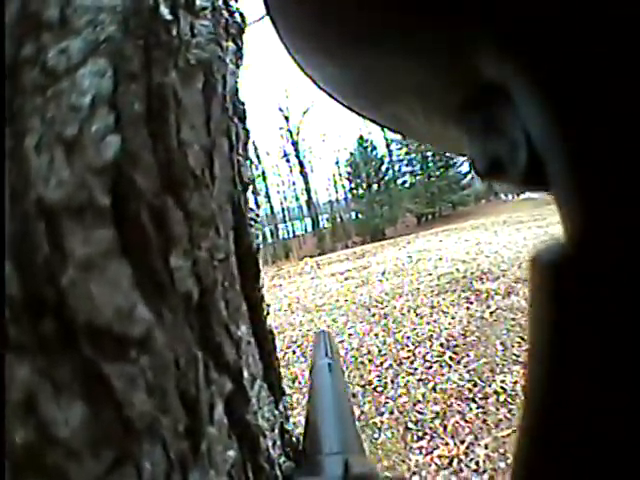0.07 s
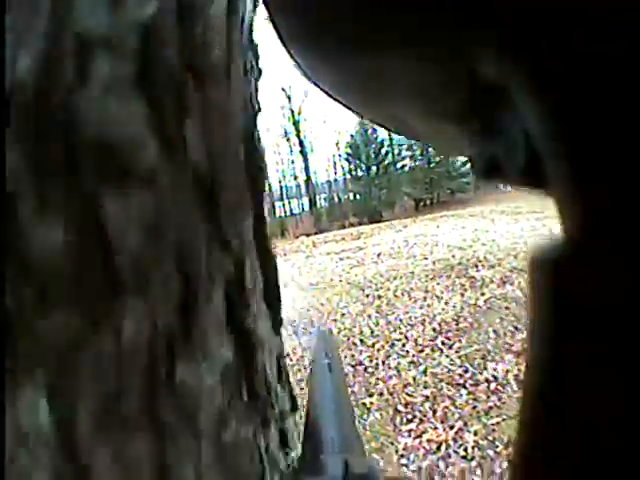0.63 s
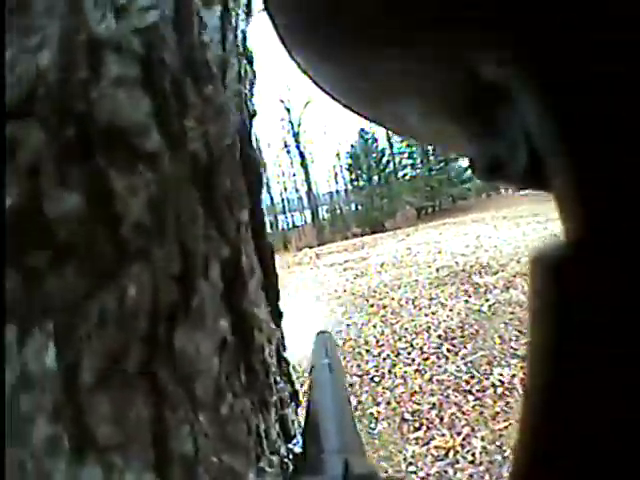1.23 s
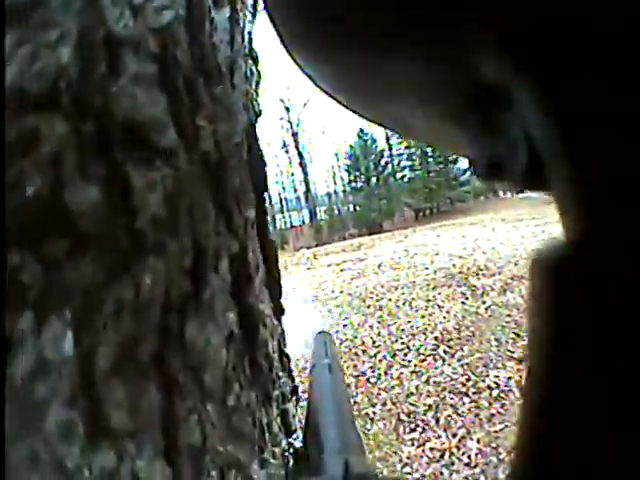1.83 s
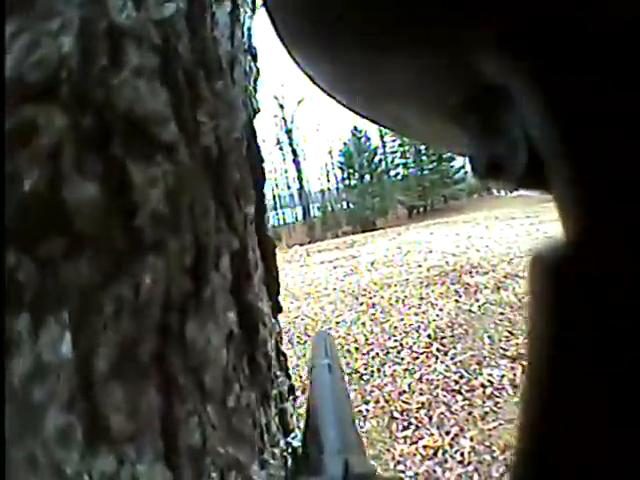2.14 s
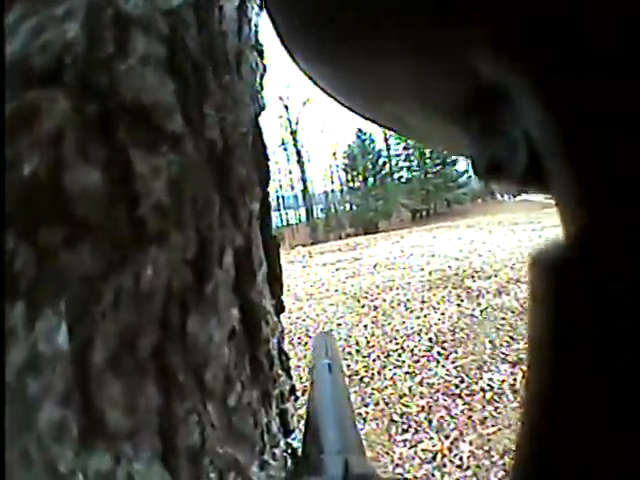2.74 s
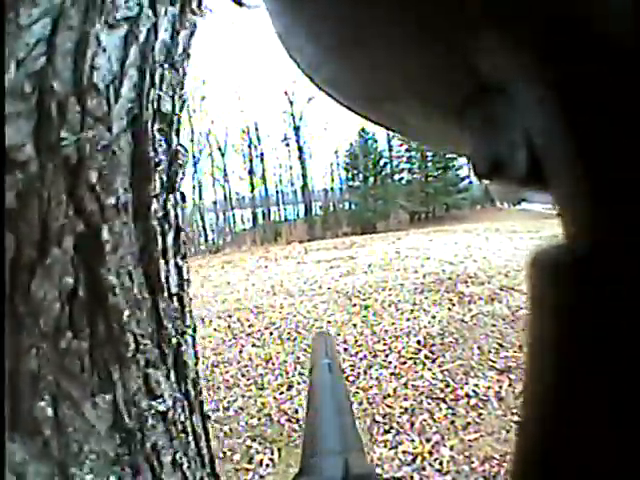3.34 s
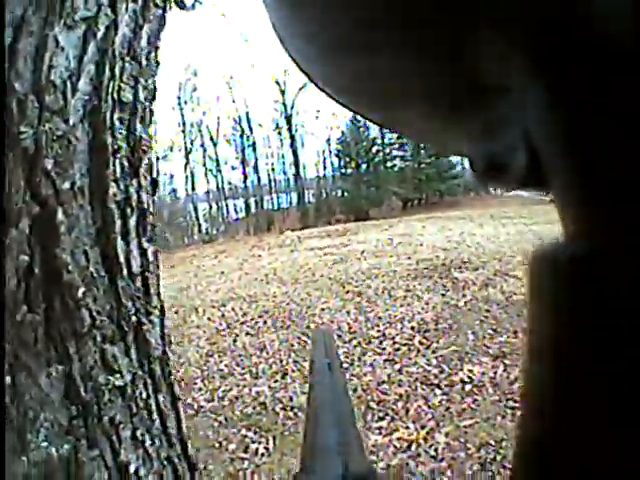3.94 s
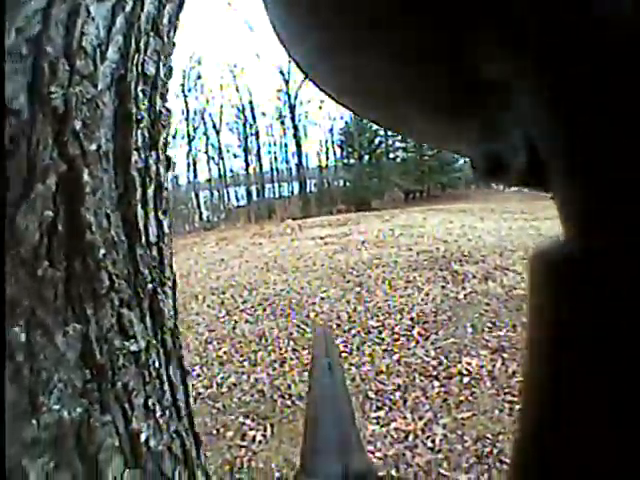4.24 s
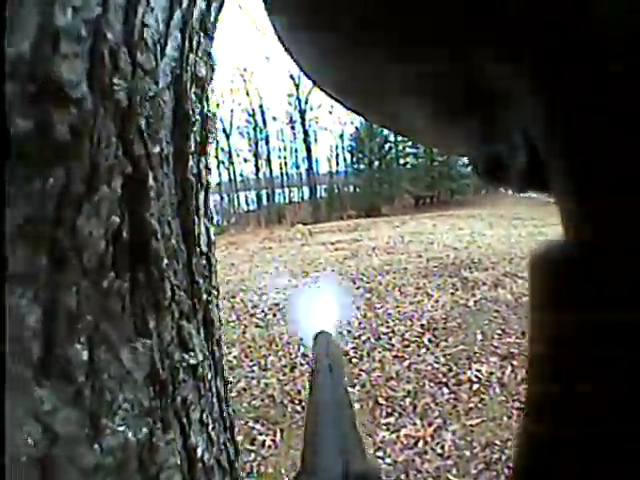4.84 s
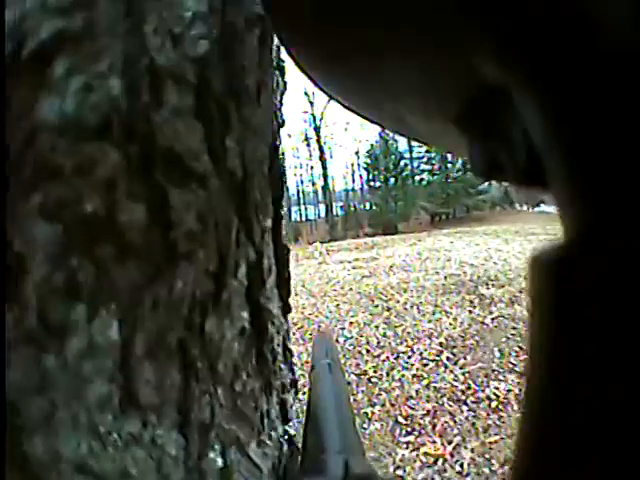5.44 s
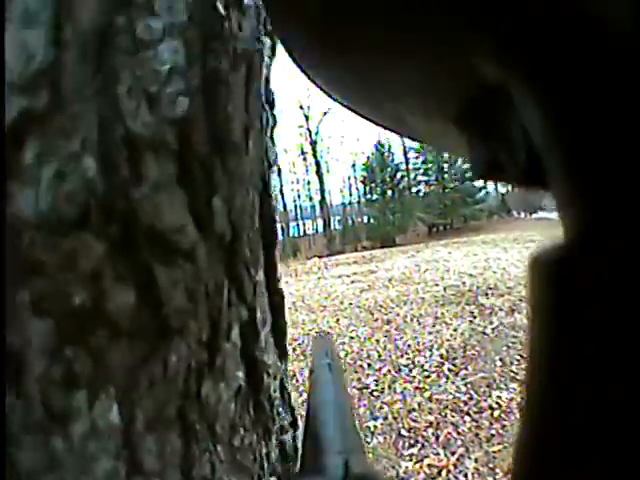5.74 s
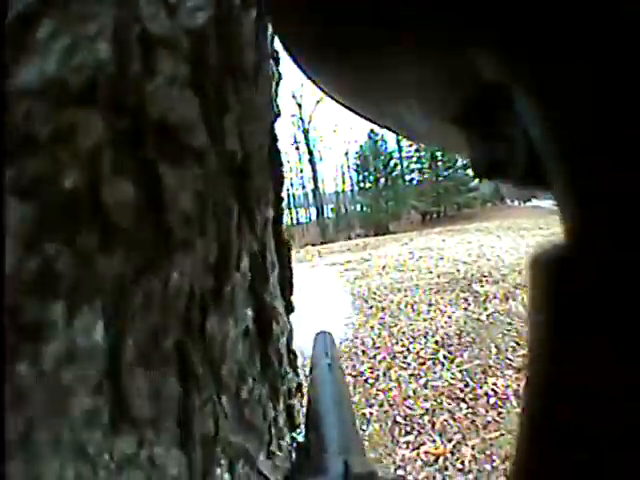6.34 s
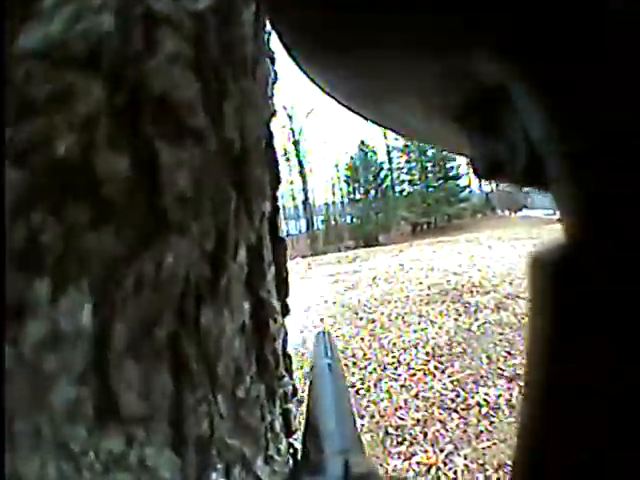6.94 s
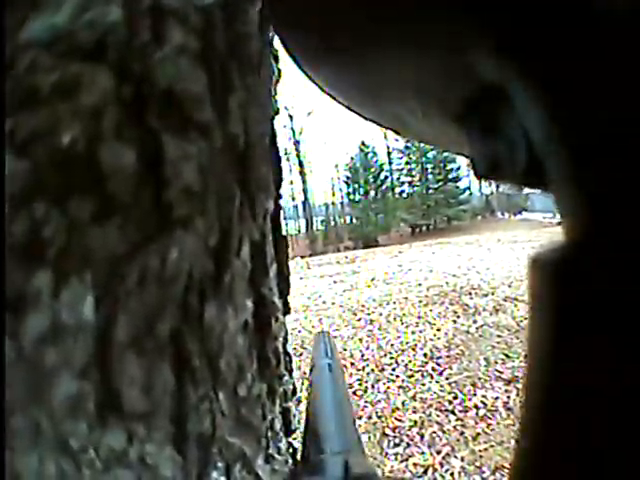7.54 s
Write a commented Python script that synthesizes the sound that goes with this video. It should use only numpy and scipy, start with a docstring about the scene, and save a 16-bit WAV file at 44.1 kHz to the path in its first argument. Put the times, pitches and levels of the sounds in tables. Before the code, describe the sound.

Close, rasping paintball shots crack in uneven bursts outdoors, each with a metallic ring and a clatter of loose plastic over faint hiss.

```python
"""Ten harsh, rasping paintball shots crack across an open field, heard by a camera on the shooter's mask.
Each is a blast of gas, kicks from the sliding bolt, ringing metal and a plastic rattle that thins to
single knocks. Between shots, handling the marker (the paintball gun) makes ticks, taps and squeaks.
The rasp comes from the shots overloading the microphone. Soft outdoor air, hiss and the camera's whine
lie underneath, and nearly all the sound is in the left channel."""
import sys
import numpy as np
from scipy import signal
from scipy.fft import rfft, irfft
from scipy.io import wavfile

SR = 44100
rng = np.random.default_rng(int(sys.argv[2]) if len(sys.argv) > 2 else 0)


def put_to_file(sound):
    """Save the sound as 16-bit audio at rate SR, in the file named by the first command-line argument."""
    columns = np.atleast_2d(sound).T  # one column per channel
    safe = np.clip(columns, -1, 1)
    whole_steps = np.round(safe * 32767)
    wavfile.write(sys.argv[1], SR, whole_steps.astype(np.int16))


N = 334719
AGE = np.arange(int(1.3 * SR)) / SR  # seconds since a sound began
SHAKE_DB, SHAKE_HOLD_S = 9.5, 0.17  # how hard and how long a shot shakes the gear before it dies down


# The shots. Each row: start in seconds, bolt pitch in Hz, then bolt, spring, rattle and echo levels
# in dB, seconds from the shot to the bolt's rebound, rebound level in dB. Levels are relative.
SHOTS = [(0.468, 1926, 24.5, 10.5, -1, -8, .135, -2), (1.143, 1925, 28.5, 3, 3, 2.5, 0.17, 3.5),
         (1.4116, 1936, 27.5, 10.5, 4.5, 6, 0.19, 1), (1.7297, 1966, 15.5, 8.5, 3, -26, 0.2, -4.5),
         (2.291, 1948, 14, 11.5, 2.5, -7, 0.17, 4.5), (4.825, 1946, 27.5, -4, 0, -9, .163, 6.5),
         (6.0528, 1918, 25, 6.5, -0.5, -2.5, 0.12, -4), (6.2730, 1920, 28.5, 2, 3.5, -4, 0.21, -6.5),
         (6.7446, 1920, 25.5, 5.5, 2.5, -5.5, 0.14, 2), (7.073, 1929, 19, 6, -2.5, -1.5, 0.12, 1.5)]

def shots(track):
    """Gas bursts out, the gear shakes, the bolt slams home and rings with its spring, the trees echo."""
    for start, bolt_hz, bolt_db, spring_db, rattle_db, echo_db, rebound_s, rebound_db in SHOTS:
        shot = gas_blast() + recoil() + shudder()
        shot += undb(SHAKE_DB + rattle_db) * rattle(hits_per_s=48, spread_db=4, spots=8)
        settling = bounces(PLASTIC_TONES, db=13, bright_hz=4100, gap_s=0.017, step_db=-3.5, count=9)
        add(shot, 0.218, settling)
        bolt = undb(bolt_db) * ring(bolt_hz, t60=0.21)
        spring = undb(spring_db) * ring(hz=1749.5, t60=0.7)
        add(shot, 0.055, bolt + spring)  # the bolt is back home
        add(shot, rebound_s, undb(rebound_db) * rebound(bolt_hz))
        add(track, start, shot + undb(echo_db) * field_echo())


# The tone of the escaping gas. Each row: frequency in Hz, relative level in dB.
BLAST_SPECTRUM = [(60, 0), (400, -6), (1200, -7.5), (2000, 7), (2700, -8.5), (4000, -12), (6000, -16.5),
                  (10000, -17.5), (16000, -18)]

def gas_blast():
    """Released gas makes a loud burst of noise that fades fast."""
    return undb(20) * noise(BLAST_SPECTRUM) * fade(t60=0.29)


# The bolt's pushes. Each row: seconds after the shot, length in seconds, typical level in dB.
RECOIL_KICKS = [(0.017, 0.00292, 23.5), (0.026, 0.00504, 28.5), (0.03, 0.00294, 28.5),
                (0.0384, 0.00812, 38), (0.053, 0.00425, 35)]

def recoil():
    """The sliding bolt shoves the microphone several times, never quite alike."""
    out = np.zeros(len(AGE))
    for start, length, db in RECOIL_KICKS:
        late_s, extra_db = rng.normal(0, [0.00073, 2.94])
        progress = np.clip((AGE - start - late_s) / length, 0, 1)
        out -= undb(db + extra_db) * np.sin(np.pi * progress) ** 2
    return out


# The low rumble of the marker's body. Each row: frequency in Hz, relative level in dB.
BODY_SPECTRUM = [(30, -22), (80, 3.5), (130, -4.5), (200, -5.5), (280, 1.5), (380, -5.5), (600, -3.5),
                 (1000, -6.5), (2000, -83), (6000, -49)]

def shudder():
    """The body rumbles harder as the bolt travels, then dies away; a little stays in the shaking gear."""
    peak_s = 0.045
    swell = np.minimum(AGE / peak_s, 1) * hold_then_fade(peak_s, t60=0.074)
    return (undb(21) * swell + undb(SHAKE_DB - 23) * shaking()) * noise(BODY_SPECTRUM)


def rebound(bolt_hz):
    """The bolt bounces, thudding against the body and ringing again."""
    thud = undb(10.5) * noise(BODY_SPECTRUM) * fade(t60=0.019)
    return thud + undb(9) * ring(bolt_hz, t60=0.15)


# How the plastic gear rings. Each row: pitch in Hz, fade time in seconds, relative level in dB.
PLASTIC_TONES = [(543, 0.018, -15), (890, 0.016, -6), (1057, 0.019, -3), (1361.5, 0.017, -2),
                 (1705, 0.019, 1), (1986, 0.013, 2.5), (2854, 0.0064, -6), (3510, 0.028, -22.5),
                 (6160, 0.0077, -12.5)]

def rattle(hits_per_s, spread_db, spots):
    """Uneven hits land on several spots of the shaken plastic, growing rarer and weaker."""
    rate = hits_per_s * hold_then_fade(SHAKE_HOLD_S, t60=0.6)
    out = np.zeros(len(AGE))
    for _ in range(spots):
        hits = rng.random(len(AGE)) < rate / SR
        strengths = undb(spread_db * rng.standard_normal(len(AGE)))
        out += signal.oaconvolve(hits * strengths, strike(PLASTIC_TONES, scatter_db=3.5))[:len(AGE)]
    return shaking() * out / out[AGE < SHAKE_HOLD_S].std()


def shaking():
    """The gear shakes at full strength while the bolt moves, then dies down."""
    return hold_then_fade(SHAKE_HOLD_S, t60=0.29)


# The tone of the echo. Each row: frequency in Hz, relative level in dB.
ECHO_SPECTRUM = [(60, -31), (200, -20), (600, -8.5), (1100, -4), (1800, 0), (2500, -6), (4000, -34.5),
                 (6200, -20), (8000, -54), (16000, -43)]

def field_echo():
    """Trees scatter the shot back as a wash of noise with a faint, longer tail."""
    return noise(ECHO_SPECTRUM) * (fade(t60=0.71) + undb(-14.5) * fade(t60=1.65))


# Knocks of the loose gear. Each row: start in seconds, peak level in dB.
GEAR_KNOCKS = [(.746, 13.5), (.764, -0.5), (.779, -1), (0.836, -8.5), (0.974, -10.5), (1.397, 18),
               (2.008, -2.5), (2.032, -12), (2.531, 17), (2.559, 13), (2.607, 14.5), (2.640, -3.5),
               (5.089, 17.5), (5.106, 11), (5.122, 7), (5.142, -1), (6.575, 9.5), (6.604, 3), (6.620, -3),
               (7.02, 14.5), (7.059, 15), (7.322, 19), (7.372, 17.5), (7.397, 8), (7.472, 10.5)]

def gear_knocks(track):
    """Loose plastic parts hit each other in single hard knocks."""
    for start, db in GEAR_KNOCKS:
        add(track, start, knock(PLASTIC_TONES, db, bright_hz=4000))


# How the hopper rings. Each row: pitch in Hz, fade time in seconds, relative level in dB.
HOPPER_TONES = [(794, 0.0095, -1.5), (1070, 0.036, 0.5), (1320, 0.011, 8.5), (1733, 0.023, 7),
                (2900, 0.0099, -10)]
# Taps on the hopper. Each row: start in seconds, peak level in dB, brightness in Hz.
HOPPER_TAPS = [(5.282, -15.5, 900), (5.519, -3, 2500), (5.527, -10, 1800), (5.541, -3, 2000),
               (5.568, -5.5, 2010), (5.738, -14, 950), (6.724, -4.5, 1500), (7.558, -9.5, 1280)]

def hopper_taps(track):
    """The hopper, the hollow tub that holds the paintballs, is tapped; each tap bounces once."""
    for start, db, bright_hz in HOPPER_TAPS:
        add(track, start, bounces(HOPPER_TONES, db, bright_hz, gap_s=0.01, step_db=-17, count=2))


# How the small metal parts ring. Each row: pitch in Hz, fade time in seconds, relative level in dB.
METAL_TONES = [(1625, 0.015, -5), (1996, 0.026, -5), (2540, 0.0068, -9), (5600, 0.0067, -18),
               (6200, 0.026, -16), (9500, 0.0092, -17)]
# Ticks of those parts. Each row: start in seconds, peak level in dB, brightness in Hz.
METAL_TICKS = [(2.156, -7.5, 12000), (3.014, -21.5, 2490), (3.057, -24.5, 4000), (3.659, -21.5, 2484),
               (5.478, -9, 5000), (5.486, -5.5, 5000), (5.4953, 4, 2900), (5.508, -17, 4000),
               (5.847, -23, 2500), (5.878, -22, 1500), (6.039, -17, 2500)]

def metal_ticks(track):
    """Small metal parts click and bounce as the trigger is pulled and the marker is handled."""
    for start, db, bright_hz in METAL_TICKS:
        add(track, start, bounces(METAL_TONES, db, bright_hz, gap_s=0.016, step_db=-12, count=3))


# Faint squeaks. Each row: start and length in seconds, first and last pitch in Hz, level in dB.
SQUEAKS = [(5.136, 0.11, 1360, 1346, -32), (6.655, .08, 1205, 1720, -25)]

def squeaks(track):
    """Thin tones slide in pitch as they swell and fade."""
    for start, length, first_hz, last_hz, db in SQUEAKS:
        progress = np.clip(AGE / length, 0, 1)
        hz = first_hz + (last_hz - first_hz) * progress
        swell = np.sqrt(4 * progress * (1 - progress))
        add(track, start, undb(db) * swell * np.sin(2 * np.pi * np.cumsum(hz) / SR))


# The outdoor air, the amplifier's hiss and the camera's whine.
# Each row: frequency in Hz, relative level in dB.
AIR_SPECTRUM = [(25, -7), (50, 2), (90, -5), (175, 1.5), (260, -3.5), (420, 0), (650, -4), (1150, -4),
                (1700, 3), (2100, 0), (3100, -12.5), (4500, -17.5), (6300, -11), (9000, -49)]
HISS_SPECTRUM = [(3000, -20.5), (6500, -1), (8500, 6), (10000, 1), (13000, 2.5), (15000, -44)]
WHINE_TONES = [(7867.4, -32.6), (15734.8, -48)]

def background():
    """Outdoor air swells gently while the amplifier hisses and the camera whines steadily."""
    t = np.arange(N) / SR
    swell_db = 0.99 * np.interp(t, np.linspace(0, t[-1], 20), rng.standard_normal(20))
    air = undb(-44.5 + swell_db) * noise(AIR_SPECTRUM, N)
    hiss = undb(-56.5) * noise(HISS_SPECTRUM, N)
    whine = sum(undb(db + 1.36) * np.sin(2 * np.pi * hz * t) for hz, db in WHINE_TONES)
    return air + hiss + whine


def strike(tones, scatter_db):
    """One hit on a part: a brief crunch, then ringing tones that differ from spot to spot."""
    chance = rng.standard_normal((len(tones), 2))
    t = AGE[:SR // 20]
    crunch = undb(-16) * rng.standard_normal(len(t)) * fade(0.028, t)
    out = butter(crunch, 5000, "low")
    for k, ((hz, t60, db), (louder, higher)) in enumerate(zip(tones, chance)):
        out += (-1) ** k * undb(db + scatter_db * louder) * ring(hz * (1 + 0.048 * higher), t60, t)
    return out


def knock(tones, db, bright_hz):
    """One hit peaking at db; a softer contact has a lower bright_hz and sounds duller."""
    hit = butter(strike(tones, scatter_db=3.0), bright_hz, "low", order=2)
    return undb(db) * hit / np.abs(hit).max()


def bounces(tones, db, bright_hz, gap_s, step_db, count):
    """A knock and its ever weaker bounces, unevenly spaced."""
    out, start = np.zeros(SR // 2), 0
    for k, uneven in enumerate(rng.standard_normal(count)):
        add(out, start, knock(tones, db + k * step_db, bright_hz))
        start = min(start + gap_s * np.exp(0.25 * uneven), 0.4)
    return out


def ring(hz, t60, t=AGE):
    """One fading tone of a struck part."""
    return np.sin(2 * np.pi * hz * t) * fade(t60, t)


def fade(t60, t=AGE):
    """A smooth fall in level; t60 is the fade time, the seconds it takes to drop 60 dB."""
    return np.exp(-np.log(1000) * t / t60)


def hold_then_fade(hold_s, t60):
    """Stay at full level, then fade."""
    return fade(t60, np.maximum(AGE - hold_s, 0))


def noise(spectrum, size=len(AGE)):
    """Noise shaped by a spectrum table, scaled to a typical size of 1."""
    hz, db = np.transpose(spectrum)
    freqs = np.maximum(np.arange(size // 2 + 1) * SR / size, 1)
    gains = undb(np.interp(np.log(freqs), np.log(hz), db))
    shaped = irfft(rfft(rng.standard_normal(size)) * gains, size)
    return shaped / shaped.std()


def butter(sound, hz, kind, order=1):
    """A gentle filter: "low" keeps what is below hz, "high" what is above."""
    return signal.sosfilt(signal.butter(order, min(hz, SR / 2 - 1), kind, fs=SR, output="sos"), sound)


def undb(db):
    """Turn decibels into a number to multiply by."""
    return 10 ** (np.asarray(db) / 20)


def add(track, start_s, sound):
    """Mix a sound into the track at a given time."""
    start = max(int(start_s * SR), 0)
    part = sound[:len(track) - start]
    track[start:start + len(part)] += part


def scene():
    """Everything reaches one microphone."""
    track = background()
    for source in (shots, gear_knocks, hopper_taps, metal_ticks, squeaks):
        source(track)
    return track[None]


def record(dry):
    """The microphone squashes loud peaks, the amplifier cuts them flat, and the left channel is fed."""
    sound = dry[0]
    headroom = np.where(sound > 0, undb(8.5), undb(28))  # upward swings squash sooner
    squashed = sound / (1 + np.abs(sound) / headroom)
    # while a kick pins the microphone, its capacitor drains and the sound chokes for a moment
    drained = butter(squashed, 112, "high")
    # a trace of treble slips past the overload and roughens the flat tops
    leak = undb(-58) * butter(sound, 2000, "high")
    left = butter(np.clip(drained, -0.93, 0.93) + leak, 9450, "low")
    right = undb(-65) * left + undb(-48.5) * butter(left, 8000, "high")  # faint spill, mostly treble
    treble_cut = signal.ellip(8, 0.1, 60, 16600, fs=SR, output="sos")  # steep drop above 16600 Hz
    return signal.sosfiltfilt(treble_cut, [left, right])


dry = scene()
out = record(dry)
put_to_file(out)
```